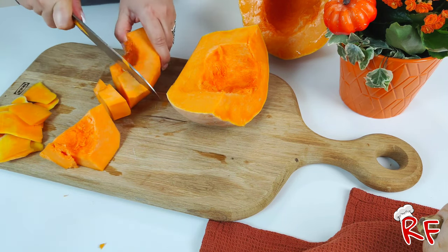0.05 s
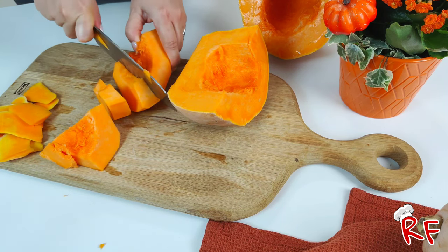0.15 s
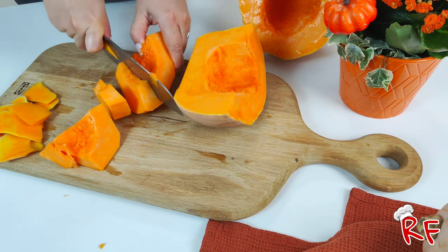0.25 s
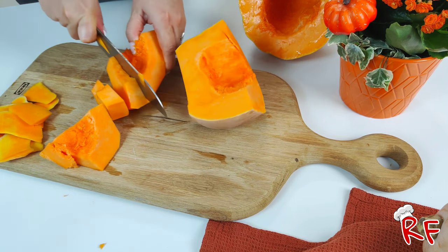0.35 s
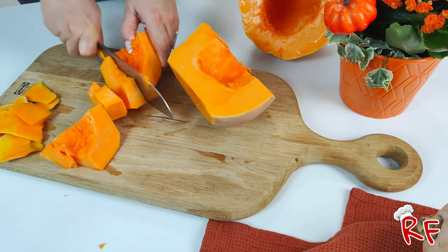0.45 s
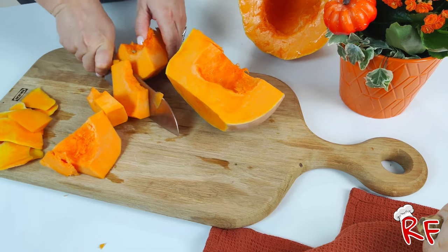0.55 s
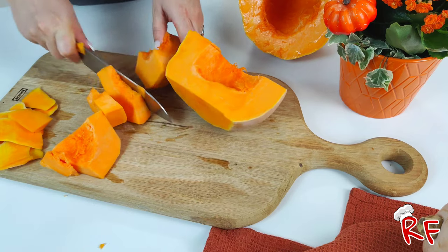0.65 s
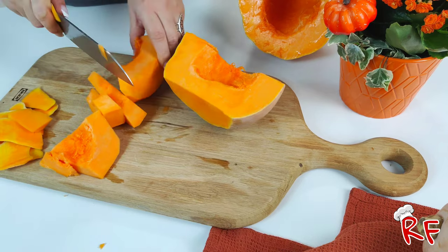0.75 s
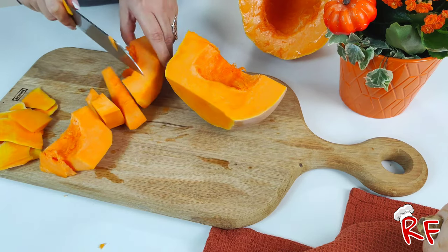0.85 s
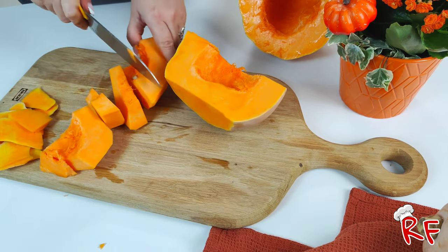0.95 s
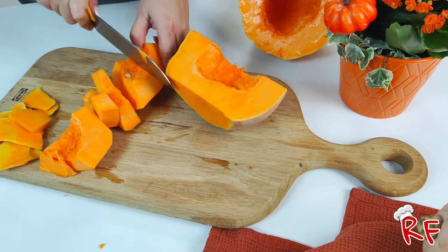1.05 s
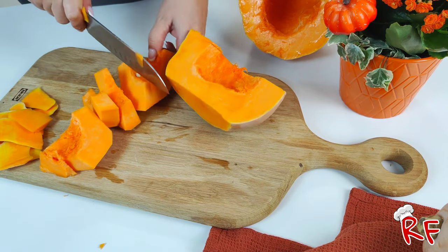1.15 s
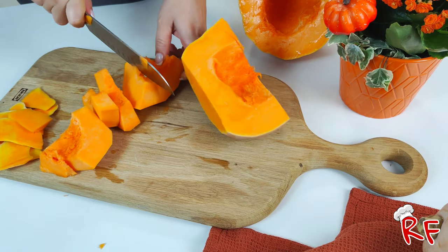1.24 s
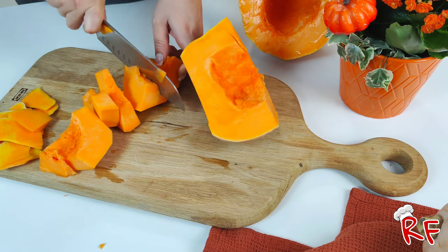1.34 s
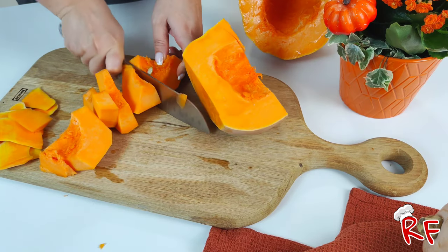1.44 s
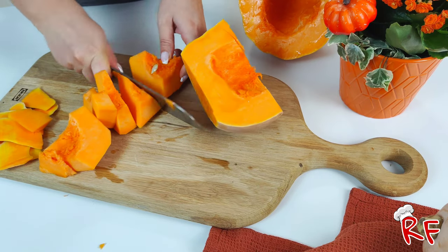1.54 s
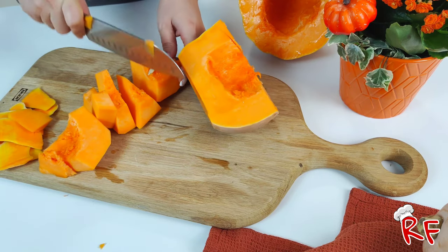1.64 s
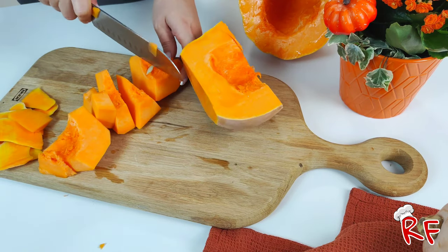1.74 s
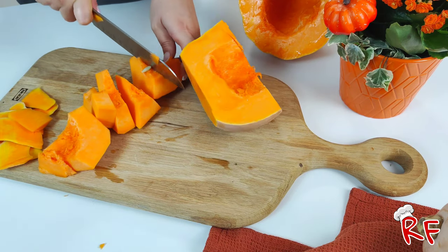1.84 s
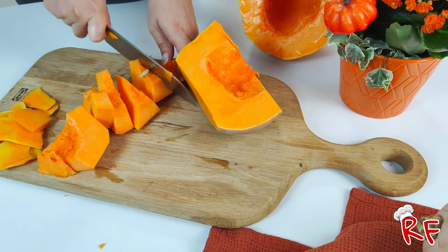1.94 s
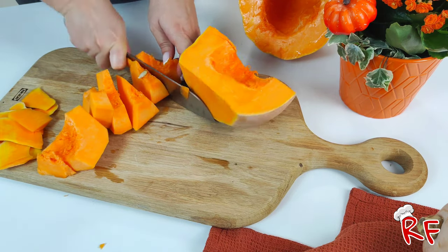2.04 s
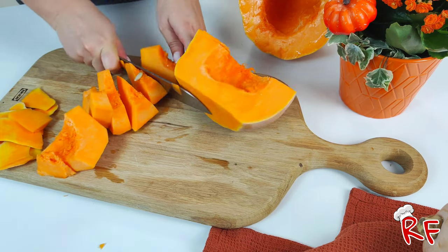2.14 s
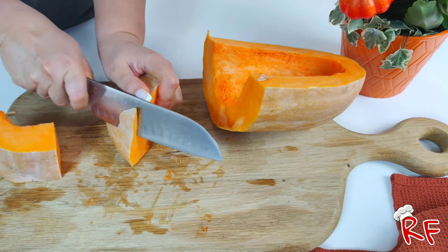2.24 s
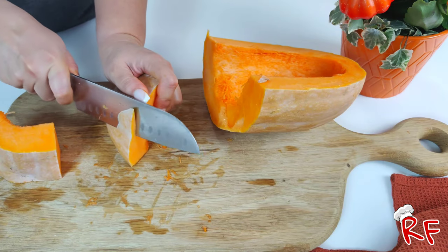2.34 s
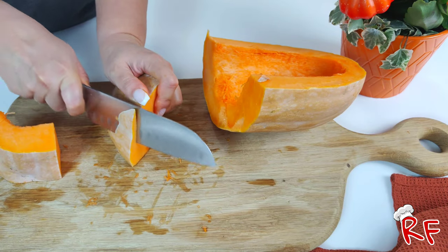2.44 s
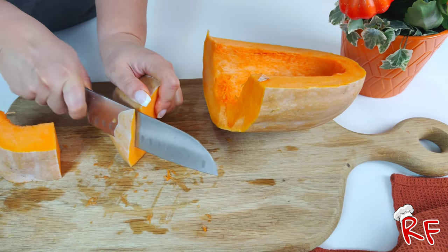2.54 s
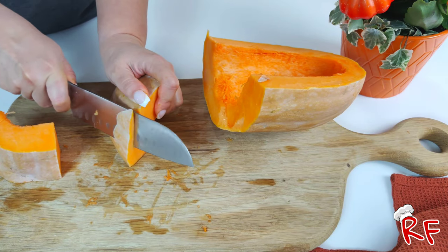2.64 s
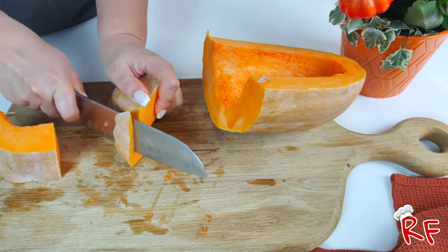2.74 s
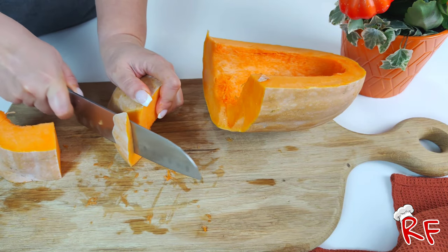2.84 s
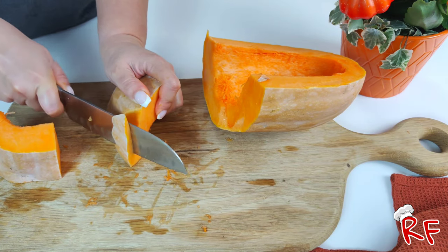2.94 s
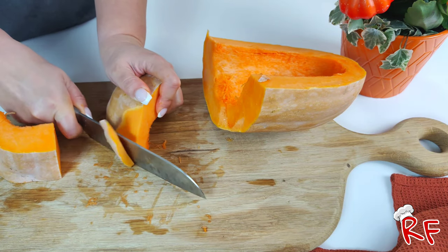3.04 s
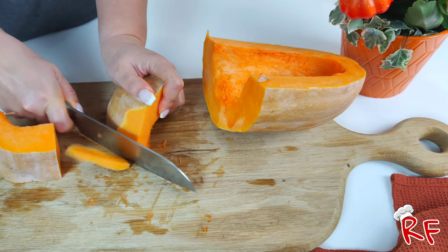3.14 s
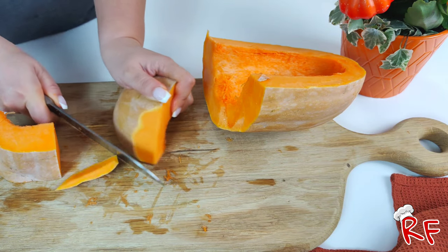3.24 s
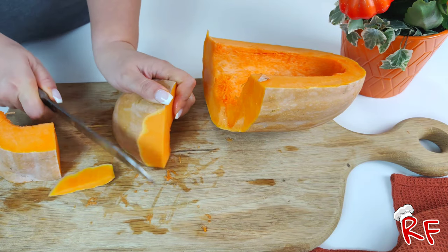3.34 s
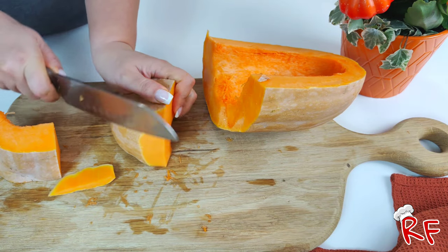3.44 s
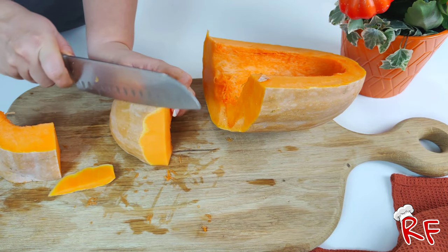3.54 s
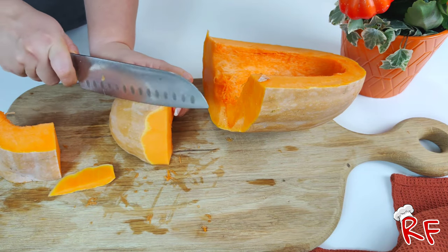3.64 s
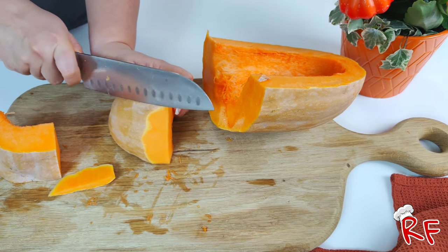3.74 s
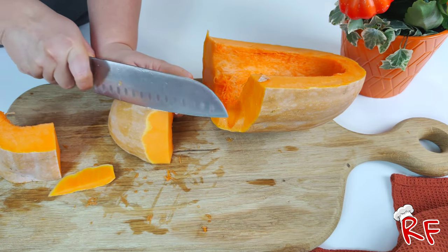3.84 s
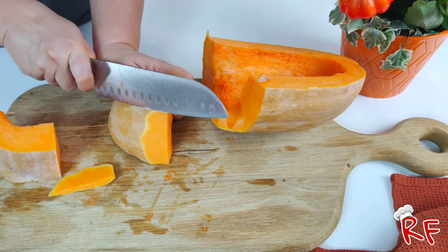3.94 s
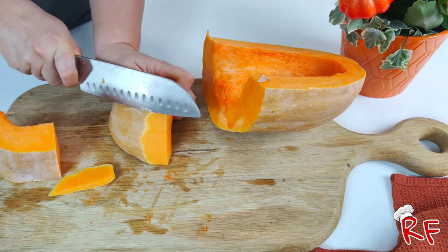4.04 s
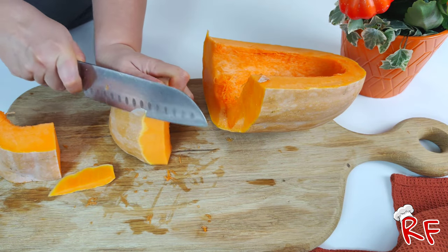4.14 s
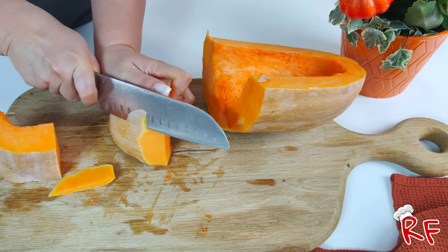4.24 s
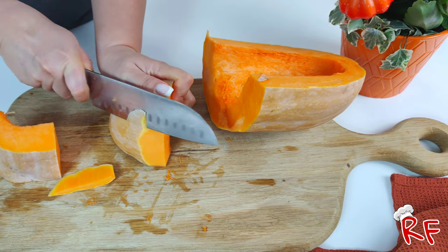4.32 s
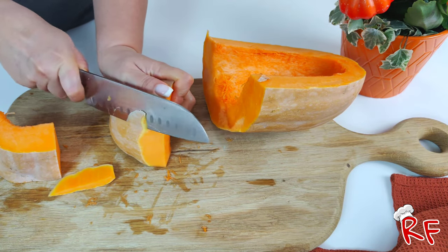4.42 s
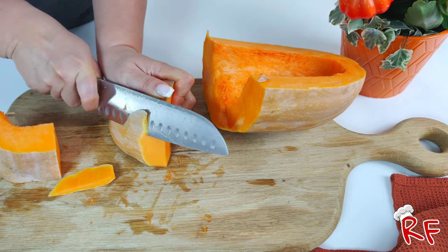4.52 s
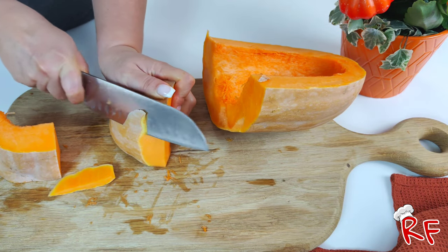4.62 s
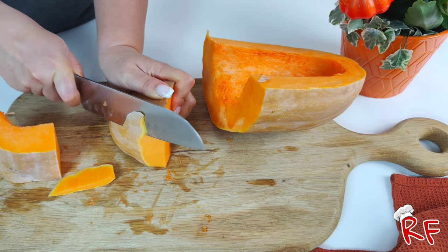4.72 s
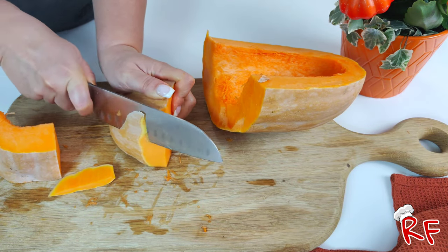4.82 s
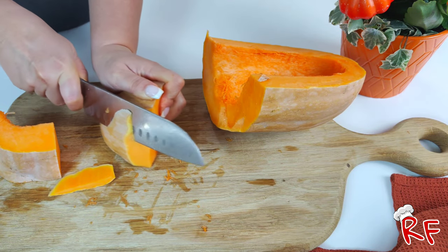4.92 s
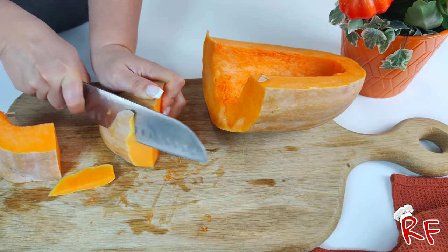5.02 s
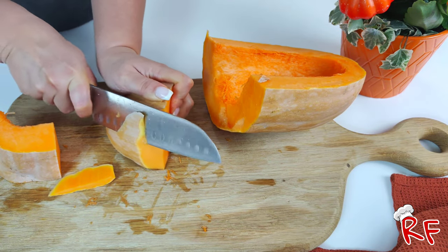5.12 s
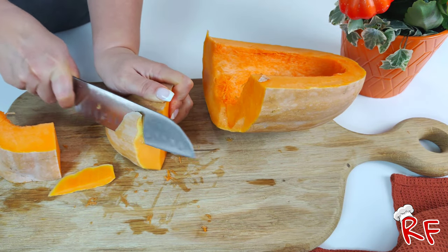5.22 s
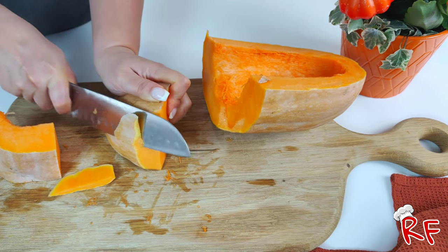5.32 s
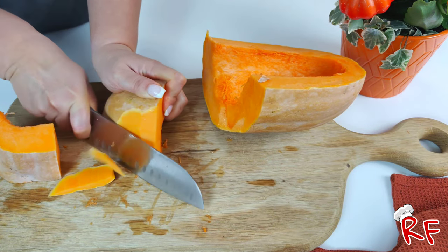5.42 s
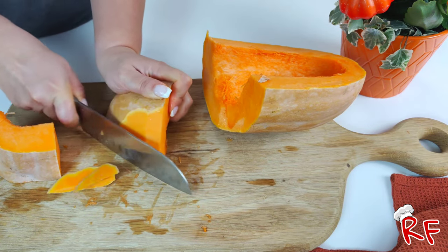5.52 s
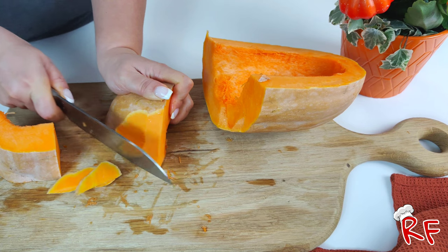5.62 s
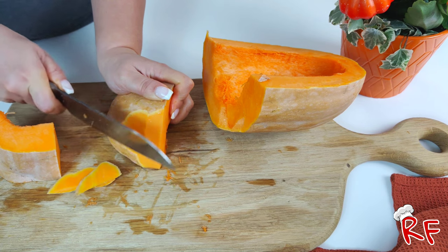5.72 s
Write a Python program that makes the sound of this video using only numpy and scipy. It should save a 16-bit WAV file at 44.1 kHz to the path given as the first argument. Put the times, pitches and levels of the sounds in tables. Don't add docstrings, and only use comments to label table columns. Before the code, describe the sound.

Wet tearing of firm pumpkin flesh, with bright quick chops at first, then heavier, longer-ringing knife blows and tumbling pieces on wood.

```python
import sys
import numpy as np
from scipy import signal
from scipy.fft import rfft, irfft, next_fast_len
from scipy.io import wavfile
from scipy.ndimage import uniform_filter1d

SR = 44100
rng = np.random.default_rng(int(sys.argv[2]) if len(sys.argv) > 2 else 0)


def generate_wav(signal):
    frames = np.transpose(np.atleast_2d(signal))
    scaled = np.clip(frames, -1, 1) * 32767
    pcm = np.round(scaled).astype(np.int16)
    wavfile.write(sys.argv[1], SR, pcm)


def boost_factor(decibels):
    exponent = np.asarray(decibels, float) / 20
    return 10 ** exponent


N = 254438
LONG = next_fast_len(N)

# t/s, peak level/dB, thud re body/dB, edge re body/dB, room send/dB
FAR_HITS = [
    (0.368, -43.5, -35, -1, -4.5),
    (0.404, -46, -40, 40, -5),
    (0.505, -39, -43.5, 24, 2.5),
    (0.5896, -8, -18.5, 2.5, 6),
    (1.5205, -12, -10.5, -6.5, -9),
    (1.886, -69, -31.5, 14, -17),
    (2.108, -10.5, -8, -5, -10),
]
NEAR_HITS = [
    (3.183, -26, -3, -18, -7),
    (3.1897, -1.95, -9.5, -16.5, -3),
    (3.373, -20, -20, -5, -26),
    (3.766, -41.5, -16, 7, -30),
    (4.908, -44.5, -34.5, -6.5, -1.5),
]
LAST_HITS = [
    (5.539, -21, 13, 2, -21),
    (5.551, -2, -13, -3, -1),
    (5.554, -7, -24, -3, -24),
]


def evened(x):
    return x / np.sqrt(np.mean(x ** 2) + 1e-20)


def smooth(x, size):
    return evened(uniform_filter1d(uniform_filter1d(x, size=size), size=size))


def read(points, hz):
    f, value = np.transpose(points)
    return np.interp(np.log(hz + 1), np.log(f + 1), value)


def three_bands(hz, low_hz, high_hz):
    low = 1 / (1 + (hz / low_hz) ** 6)
    high = 1 / (1 + (high_hz / (hz + 1)) ** 4)
    return np.array([low, abs(1 - low - high), high])


def causal(gain):
    log_gain = np.log(np.maximum(np.r_[gain, gain[-2:0:-1]], 1e-5 * gain.max()))
    return np.fft.ifft(np.exp(np.conj(signal.hilbert(log_gain)))).real


def diffuse(pair):
    # f/Hz, left-right likeness (0 to 1)
    likeness = [(60, 0.8), (400, 0.88), (750, .5), (1400, 0.04), (3000, 0.034)]
    same = np.clip(read(likeness, np.fft.rfftfreq(pair.shape[1], 1 / SR)), 0, 1)
    left, other = rfft(pair)
    return irfft([left, same * left + np.sqrt(1 - same ** 2) * other], pair.shape[1])


def air(colour, db):
    z = rfft(diffuse(rng.standard_normal((2, LONG))))
    z = z * boost_factor(read(colour, np.fft.rfftfreq(LONG, 1 / SR)))
    return boost_factor(db) * evened(irfft(z, LONG)[:, :N])


def room_tone(fade):
    # f/Hz, level/dB
    far_air = [(15, -31.5), (25, -20), (82, -18), (236, 4.5), (326, -5.5), (734, -10.5), (988, -8),
               (1610, -17), (4370, -13.5), (9070, -26.5), (10100, -33.5), (11900, -20), (16000, -53)]
    near_air = [(15, -37.5), (25, -8), (122, 11), (230, -11), (397, 5.5), (448, -46), (512, -34), (600, -8),
                (780, -44), (1320, -120)]
    return air(far_air, -72.5) + (1 - fade) * air(near_air, -71.5)


def patchy(x, depth_db):
    z = signal.stft(x, nperseg=512)[2]
    patches = uniform_filter1d(rng.standard_normal(z.shape[1:]), size=3, axis=0)
    patches = uniform_filter1d(patches, size=9, axis=1)
    return signal.istft(z * boost_factor(depth_db * evened(patches)), nperseg=512)[1][:, :N]


def stroke_db(t, start, length, swell_db, echo_db, echo_db_per_s):
    bite_db_per_s, release_db_per_s = 900, 316.5
    after = np.maximum(t - start - length, 0)
    hold = swell_db * (np.clip((t - start) / max(length, 1e-3), 0, 1) - 1)
    bite = -bite_db_per_s * np.maximum(start - t, 0)
    return hold + bite + np.maximum(-release_db_per_s * after, echo_db - echo_db_per_s * after)


def sawing(strokes, flesh, low_hz, high_hz, grit_db, echo_db, echo_db_per_s,
           rest_hiss_db, rest_rasp_db, hand_db, hand_db_per_db):
    hz, t = np.fft.rfftfreq(LONG, 1 / SR), np.arange(0, N + 32, 32) / SR
    grit = boost_factor(grit_db * evened(uniform_filter1d(rng.standard_normal(N), size=130)))
    grains = patchy(grit * rng.standard_normal((2, N)), 2.4)
    fibres = rfft(diffuse(grains), LONG) * boost_factor(read(flesh, hz))
    layers = [evened(irfft(fibres * band, LONG)[:, :N]) for band in three_bands(hz, low_hz, high_hz)]

    shapes = np.array([boost_factor(db + stroke_db(t, s, length, swell_db, echo_db, echo_db_per_s)) ** 2
                       for s, length, db, swell_db, _ in strokes])
    hiss_power = shapes.sum(0) + boost_factor(rest_hiss_db) ** 2
    rasp_power = boost_factor([row[4] for row in strokes]) ** 2 @ shapes + boost_factor(rest_rasp_db) ** 2
    rumble_power = boost_factor(hand_db) ** 2 * (hiss_power / boost_factor(-60) ** 2) ** hand_db_per_db
    return sum(np.interp(np.arange(N) / SR, t, np.sqrt(power)) * layer
               for power, layer in zip((rumble_power, rasp_power, hiss_power), layers))


def far_sawing():
    # t/s, length/s, final hiss level/dB, swell along the stroke/dB, rasp re hiss/dB
    strokes = [(.086, .004, -76.5, -3, 1), (.122, .014, -73, 6, -1), (.149, .008, -74, -2, -1),
               (.174, 0.0043, -66.5, 5, -3), (.19, .005, -84, -3, -8), (.217, 0.0091, -58, 13, -4.5),
               (.237, 0.0094, -61, 10, -4.5), (.255, 0.026, -62, 6, -4), (.33, 0.024, -61, 2.5, -1.5),
               (.388, .012, -46, 10, -13), (.503, 0.0039, -45, 13, -24), (.55, 0.039, -49.5, 27, -2.5),
               (1.03, .014, -70.5, -4, -25), (1.2, .18, -77, 9, -8.5), (1.32, 0.013, -71, -2, -13),
               (1.405, .008, -59.5, 3, -8), (1.46, 0.063, -57.5, 6, -10), (1.889, .004, -68, -4, -7.5),
               (1.95, 0.19, -55, 8.5, -10)]
    # f/Hz, level/dB per Hz
    flesh = [(24, -79), (40, -33), (118, -3), (171, -28.5), (320, -2), (363, -25.5), (392, -2), (831, -5.5),
             (942, -2), (1040, -5.5), (1270, -5), (11300, -33.5), (16000, -45)]
    return sawing(strokes, flesh, 320, 4600, grit_db=1.6, echo_db=-18.5, echo_db_per_s=129.5,
                  rest_hiss_db=-89.5, rest_rasp_db=-86, hand_db=-82.5, hand_db_per_db=0.72)


def creaks():
    # t/s, level/dB, f/Hz, t60/s
    creaks_and_clacks = [(0.274, -54.5, 1024, 0.21), (0.373, -43, 2430, 0.022), (0.389, -46, 229, 0.052),
                         (0.51, -46, 2770, 0.03), (0.975, -59, 234, 0.31), (1.138, -55, 225, 0.11),
                         (1.678, -43, 1084, 0.2), (1.887, -60, 3200, 0.056), (1.99, -57, 820, 0.24),
                         (2.08, -49, 864, 0.21), (2.233, -46, 235, 0.12), (2.601, -44, 496, 0.24),
                         (2.716, -47, 373.4, 0.16), (3.766, -47.5, 235, 0.16), (4.175, -59, 2720, 0.2),
                         (4.2, -59, 2900, 0.14), (4.699, -52, 1238, 0.29), (5.046, -34.5, 347, 0.2),
                         (5.208, -33.5, 489.3, 0.37), (5.336, -35, 401, 0.1), (2.712, -43, 972, 0.082),
                         (2.712, -48, 1540, 0.053), (2.714, -61, 2261, 0.038), (.122, -63, 3770, 0.051),
                         (.148, -61, 3720, 0.034), (.238, -57, 5400, .05), (5.37, -45, 664, 0.28),
                         (5.473, -42.5, 143.5, 0.23), (5.05, -36.5, 2316, 0.037), (5.187, -32, 1920, 0.07),
                         (5.262, -22, 1560, 0.038), (5.574, -24, 1095, 0.5), (5.6, -33, 2080, 2.8),
                         (4.085, -40, 1380, 0.024), (3.93, -56.5, 1240, 0.54),
                         (1.666, -26, 1060, .045), (2.1105, -30, 4200, .04), (2.11, -31, 5200, .03),
              (2.1115, -22, 2150, .04), (5.1815, -16, 1250, .035), (5.177, -27, 980, .04),
              (5.22, -38, 2250, .15), (5.35, -37, 430, .07), (3.767, -44, 1320, .05),
              (3.767, -50, 2750, .04), (3.767, -50, 4150, .04), (.511, -50, 1010, .08),
              (.493, -56, 1050, .06), (.586, -42, 4400, .04), (3.136, -52, 2150, .1),
              (5.54, -36, 2000, .04), (2.245, -55, 740, .1), (2.4, -52, 250, .12), (5.269, -36, 2900, .03),
              (5.551, -30, 5800, .03), (5.06, -48, 2250, .2), (3.21, -20, 1080, .06)]
    rise, sag = 0.046, -0.006
    tones = creaks_and_clacks
    t, out = np.arange(16384) / SR, np.zeros((2, N + 16384))
    for (s, db, hz, t60), waver in zip(tones, rng.standard_normal((len(tones), 2, 16384))):
        waver = smooth(waver, 300)
        tone = np.cos(2 * np.pi * hz * t * (1 + sag * t / t60) + .3 * waver)
        tone = tone * (1 + .3 * waver[::-1])
        envelope = boost_factor(db - 60 * t / t60) * np.minimum(t / (rise * t60), 1)
        out[:, round(s * SR):][:, :len(t)] += envelope * tone
    return out[:, :N]


def blade(hits):
    return [(*hit, 1.3 - .035 * (hit[1] + 8)) for hit in hits]


def pieces(falls, rind_db):
    return [(s, peak_db, thud_db, rind_db, send_db, ms) for s, peak_db, thud_db, send_db, ms in falls]


def knocks(hits, colour, low_hz, high_hz, rings_s, peak_after_s):
    hz, t = np.fft.rfftfreq(4096, 1 / SR), np.arange(2048) / SR
    bands = three_bands(hz, low_hz, high_hz) * boost_factor(read(colour, hz))
    bands /= np.linalg.norm(bands, axis=1)[:, None]
    free = np.array([causal(band) for band in bands])
    held = free * boost_factor(-60 * np.arange(4096) / SR / np.c_[rings_s])
    direct, send = np.zeros((2, N + 8192))
    rags = rng.standard_normal((len(hits), 2048))
    for (s, peak_db, thud_db, edge_db, send_db, ms), rag in zip(hits, rags):
        u = t / (max(ms, .1) / 1000)
        push = rfft(u * np.exp(-u * 2) * rag, 4096)
        push = irfft(push / np.sqrt(abs(push) ** 2 + 0.12 * np.mean(abs(push) ** 2)))[:2048]
        share = boost_factor([thud_db, 0, edge_db])
        near = np.convolve(push, (share * boost_factor([-1.5, 0, -2.5])) @ held)
        near *= boost_factor(peak_db) / abs(near).max()
        at = round((s + peak_after_s) * SR)
        direct[at:at + len(near)] += near
        thrown = share @ free
        send[at:at + 4096] += boost_factor(send_db) * np.linalg.norm(near) * thrown / np.linalg.norm(thrown)
    return np.array([direct[:N], send[:N]])


def thumps():
    u, out = np.arange(4096) / SR * 61.6 * 2 * np.pi, np.zeros(N + 4096)
    for s, peak_db, *_ in FAR_HITS + NEAR_HITS + LAST_HITS:
        out[round(s * SR):][:4096] += boost_factor(2 * peak_db - 49) * np.sin(u) * np.exp(-u / 9.7)
    return out[:N] * boost_factor([[-1], [1]])


def squirts():
    # t/s, length/s, level/dB, from f/Hz, to f/Hz
    jets = [
        (.398, .014, -39, 5600, 4200),
        (.5005, .013, -35, 6800, 2400),
    ]
    width_hz, send_db = 1500, -11
    out = np.zeros(N)
    for (s, length, db, from_hz, to_hz), (a, b) in zip(jets, rng.standard_normal((len(jets), 2, 2048))):
        u = np.clip(np.arange(2048) / SR / length, 0, 1)
        r = np.exp(-np.pi * width_hz / SR)
        fuzz = signal.lfilter([1], [1, -2 * r, r * r], a + 1j * b)
        hz = to_hz + (from_hz - to_hz) * (1 - u) ** 1.5
        hiss = (fuzz * np.exp(2j * np.pi * np.cumsum(hz) / SR)).real
        out[round(s * SR):][:2048] += boost_factor(db) * np.sin(np.pi * u) ** 2 * evened(hiss)
    return np.array([out, boost_factor(send_db) * out])


def room(x, decays, build_s, early):
    taps = np.zeros((2, SR))
    slots = np.arange(0, SR - 20, 16)
    at = slots + rng.integers(0, 16, (2, len(slots)))
    np.put_along_axis(taps, at, rng.choice([-1., 1.], at.shape), 1)
    hz, t, z = signal.stft(taps, SR, nperseg=256)
    dying = boost_factor(-60 * t / read(decays, hz)[:, None])
    tail = signal.istft(z * dying, SR, nperseg=256)[1][:, :SR]
    tail = tail * boost_factor(.7 * smooth(rng.standard_normal(SR), 200))
    floor = early * (np.arange(SR) > 130)
    build = np.clip(np.arange(SR) / SR / build_s - .15, floor, 1) ** 1.59
    tail = diffuse(tail * build)
    return signal.fftconvolve(x[None], tail / np.linalg.norm(tail[0]), axes=1)[:, :N]


def in_room(contacts, decays, build_s, wet_db, walls, early=0.83):
    direct, send = contacts
    echoes = np.zeros((2, N))
    for k, (s, left_db, right_db) in enumerate(walls):
        skew = 5 * (-1) ** k
        bounce = [np.roll(direct, round(s * SR) + side) for side in (-skew, skew)]
        echoes += boost_factor([[left_db], [right_db]]) * np.array(bounce)
    echoes[:, :4410] = 0
    return np.array([np.roll(direct, 2), direct]) + echoes + boost_factor(wet_db) * room(send, decays, build_s, early)


def far_contacts():
    # f/Hz, level/dB per Hz
    first_board = [(35, -76.5), (60, -51), (227, -16.5), (803, -23), (991, 3), (1340, -6.5), (1780, 3),
                   (2710, -2), (3500, -9.5), (4860, -2), (7570, -18), (11800, -24.5), (14900, -44.5),
                   (16000, -44.5)]
    later_board = [(35, -77), (60, -40), (371, -26.5), (593, -14), (800, -13.5), (1060, 5), (1340, -6),
                   (2190, -2), (3340, -23), (4970, -23.5), (10800, -43.5), (11800, -38.5), (14900, -51.5),
                   (16000, -51)]
    # t/s, peak level/dB, thud re body/dB, room send/dB, contact/ms
    falls = [
        (0.981, -62.5, 2, -12.5, 5.8),
        (1.143, -64, 9, -7, 8),
        (1.239, -60.5, 9, -8, 1.4),
        (1.664, -35, -15, -5.5, 2.2),
        (2.084, -73, -4, -6, 4.3),
    ]
    # f/Hz, level/dB per Hz
    piece = [(35, -70), (60, -80), (515, 1.5), (698, -21.5), (1090, -7.5), (1380, -37), (2250, -33),
             (2580, -58), (4750, -36), (16000, -34)]
    # f/Hz, t60/s
    decays = [(300, 0.11), (600, 0.41), (950, 0.39), (2000, 0.46), (5000, 0.49), (12000, 0.5)]
    # delay t/s, left level/dB, right level/dB
    first_walls = [(0.0093, -15, -16.5), (.0147, -16, -16.5), (0.021, -16, -18), (.0294, -16.5, -20)]
    later_walls = [(.0035, -12, -19), (.0098, -27, -14), (0.012, -27, -21)]
    first = knocks(blade(FAR_HITS[:4]), first_board, 800, 2600, [.05, .03, .015], .0046) + squirts()
    later = knocks(blade(FAR_HITS[4:]), later_board, 907, 3570, [.05, .035, .025], 0.0024)
    later = later + knocks(pieces(falls, -24), piece, 870, 2500, [.08, .05, .015], 0.0015)
    faster = np.divide(decays, [1, 1.34])
    return in_room(first, decays, 0.022, 3.45, first_walls) + in_room(later, faster, .008, 9.3, later_walls)


def singing(x, wedge):
    hz = np.fft.rfftfreq(LONG, 1 / SR)
    lift_db = sum(db / (1 + (2 * (hz - f) / width) ** 2) for f, width, db in wedge)
    return irfft(rfft(x, LONG) * boost_factor(lift_db), LONG)[:, :N]


def near_sawing():
    # t/s, length/s, final hiss level/dB, swell along the stroke/dB, rasp re hiss/dB
    strokes = [(2.308, 0.17, -58.5, 4.5, -4.5), (2.558, 0.018, -55, 5.5, -1.5), (2.58, 0.057, -48, 4, -1.5),
               (2.72, 0.068, -64, -3.5, -21), (2.862, 0.059, -50, 8.5, -2.5), (3.136, 0.0085, -49.5, 4, -4),
               (3.15, 0.038, -38.5, 9, -5.5), (3.766, 0.005, -60, 0, -19), (3.942, 0.068, -62, 6.5, 2.5),
               (4.13, 0.076, -62, 5, -2), (4.286, 0.091, -48, 5, 2), (4.609, 0.0088, -66, 6, 8),
               (4.625, 0.054, -54, 1.5, 4), (4.75, 0.082, -65.5, 1.5, -2), (4.892, .012, -66, 3, -5),
               (4.913, 0.054, -51, -1, 3.5), (5.055, 0.039, -60, 7, 3.5), (5.19, 0.13, -73, -10, 16),
               (5.352, 0.075, -57, 0, -19), (5.485, 0.054, -31.5, 21, -1.5)]
    # f/Hz, level/dB per Hz
    flesh = [(24, -69.5), (40, -49.5), (118, -5), (220, -12), (422, -12.5), (491, -2), (780, -15),
             (1150, -2.5), (2500, -6), (3220, -11.5), (5580, -12.5), (6820, -20), (14800, -15.5),
             (16000, -15.5)]
    # f/Hz, width/Hz, lift/dB
    first_wedge = [(517, 50, 6), (996, 55, 8.5), (1540, 120, 1), (2233, 59, 11.5), (2700, 65, 6.5)]
    second_wedge = [(505, 21, 4), (1050, 89, 1.9), (1400, 71, 5), (2090, 120, 1.3), (2460, 82, 7.3),
                    (2960, 100, 5.8)]
    cut = sawing(strokes, flesh, 800, 3500, grit_db=0.71, echo_db=-9.5, echo_db_per_s=80,
                 rest_hiss_db=-90, rest_rasp_db=-87.5, hand_db=-66.5, hand_db_per_db=0.66)
    on_first = np.arange(N) < 3.5 * SR
    return np.where(on_first, singing(cut, first_wedge), singing(cut, second_wedge))


def ringing(contacts):
    # f/Hz, level/dB
    modes = [(511, -40), (600, -33.5), (879, -24), (1025, -30), (1073, -29), (1104, -32.5), (1245, -30),
             (1380, -31.5), (1593, -32), (1720, -34), (1943, -31.5), (2015, -26.5), (2547, -33)]
    direct, send = contacts
    size = next_fast_len(N + SR)
    hz, (mode_hz, db) = np.fft.rfftfreq(size, 1 / SR), np.transpose(modes)
    width_hz, ring_db = 16.5, -8.5
    lift = 1 + sum(boost_factor(ring_db + 9.5 + 0.57 * (d - db.max())) / (1 + 2j * (hz - f) / width_hz)
                   for f, d in zip(mode_hz, db))
    return [direct, irfft(rfft(send, size) * lift, size)[:N]]


def near_contacts():
    # f/Hz, level/dB per Hz
    board = [(35, -51), (60, -47), (113, -23), (417, -25.5), (515, -4), (636, -20), (1060, -15.5),
             (2300, -17.5), (4530, -17.5), (4860, -24), (6140, -20), (6740, -29.5), (11300, -30.5),
             (16000, -38)]
    last_board = [(35, -60.5), (60, -25), (172, -18), (417, -12.5), (503, 0), (636, -14.5), (1090, -6.5),
                  (2000, -8), (3500, -22), (4400, -28), (5050, -38), (5500, -31), (6100, -31), (6800, -45),
                  (9100, -37.5), (15000, -46), (16000, -48.5)]
    # t/s, peak level/dB, thud re body/dB, room send/dB, contact/ms
    falls = [(2.24, -47, -5, -27, 16), (2.421, -51, -5, -2, 3.9), (2.713, -39.5, 13, -16.5, 8.2),
             (3.369, -19.5, -29, -14, 13), (3.773, -44.5, -21, -29.5, 7.5), (4.086, -46, -12, -8.5, 9.6),
             (4.448, -48, -0.5, -7, 2.5), (5.044, -37.5, -2.5, -5, 15), (5.18, -23.5, -14.5, -4.5, 7.6),
             (5.187, -20, -26, -9.5, 4.5), (5.261, -23, -5.5, -13, 9.1), (5.273, -20.5, -11, -14.5, 3.4),
             (5.298, -34, 0, -15, 4.5), (5.336, -25, -1, -15.5, 3.75), (5.359, -31, 1, -30, 7.2)]
    # f/Hz, level/dB per Hz
    piece = [(35, -53), (60, -28.5), (193, -17.5), (398, 9), (785, -26), (1180, -4.5), (1740, -15),
             (2190, -9), (3340, -21), (5590, -32.5), (6430, -39), (14900, -51.5), (16000, -67)]
    # f/Hz, t60/s
    decays = [(100, 0.43), (500, 0.71), (1000, 0.79), (1600, 0.93), (3000, 0.88), (6000, 0.9), (9000, 0.61),
              (14000, 0.75)]
    # delay t/s, left level/dB, right level/dB; soft pieces throw little at the walls
    walls = [(0.0225, -4, -7), (0.0306, -8, -26), (0.0335, -15.5, -13.5), (0.0411, -17, -14.5),
             (0.0442, -25.5, -17), (0.0477, -12, -23.5), (.056, -20, -15.5), (0.0618, -12, -16),
             (0.0694, -14, -27)]
    soft_walls = [(0.0218, -21, -37), (0.0345, -19, -14)]
    hard = knocks(blade(NEAR_HITS), board, 682, 1745, [.2, .06, .015], 0)
    hard = hard + knocks(blade(LAST_HITS), last_board, 560, 1990, [.15, .09, .03], 0)
    soft = knocks(pieces(falls, -11.5), piece, 558, 2100, [.2, .05, .025], -0.0033)
    hard = in_room(ringing(hard), decays, 0.033, 9.3, walls, early=0.56)
    return hard + in_room(ringing(soft), decays, 0.019, 7.6, soft_walls)


def scene():
    change_s, fade_s = 2.22, 0.084
    fade = np.clip(1 - (np.arange(N) / SR - change_s) / fade_s, 0, 1)
    saw = fade * far_sawing() + (1 - fade) * near_sawing()
    contacts = fade * far_contacts() + near_contacts()
    return room_tone(fade) + saw + creaks() + contacts + thumps()


def roll_off(x):
    return signal.sosfilt(signal.butter(12, 16660, fs=SR, output="sos"), x)


def record(dry):
    # f/Hz, left minus right level/dB
    mic_lean = [(60, -2), (250, 0), (1000, 1), (4400, 1), (8000, -2), (12000, -8), (15000, -10)]
    hz = np.fft.rfftfreq(LONG, 1 / SR)
    lean = boost_factor(read(mic_lean, hz) / 2)
    band_limit = boost_factor(-np.clip((hz - 15750) / 12, 0, 45))
    mix = irfft(rfft(dry, LONG) * [lean, 1 / lean] * band_limit, LONG)[:, :N]
    return roll_off(mix)


dry = scene()
out = record(dry)
generate_wav(out)
```